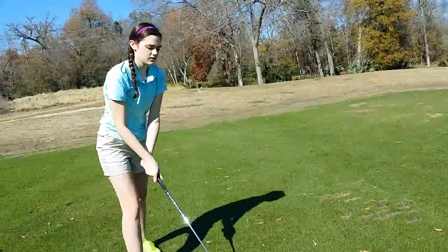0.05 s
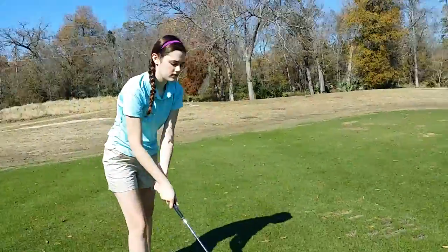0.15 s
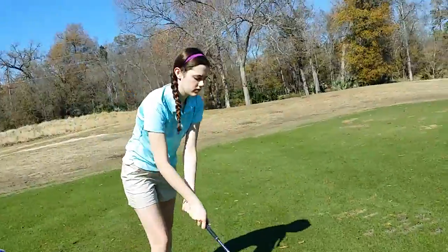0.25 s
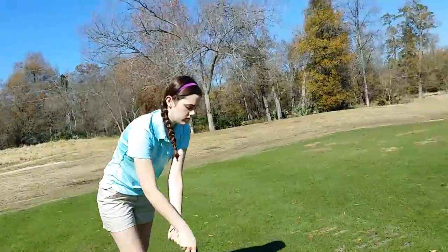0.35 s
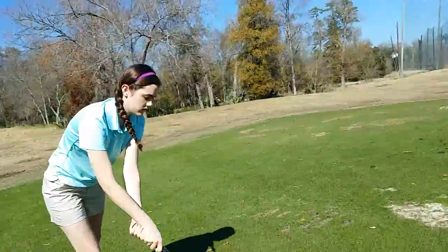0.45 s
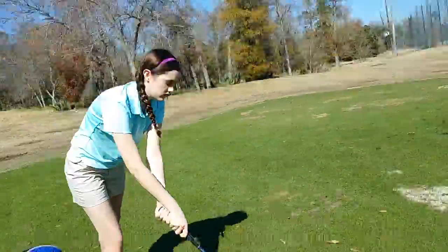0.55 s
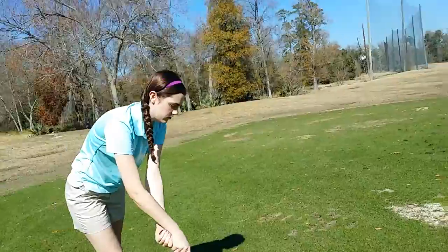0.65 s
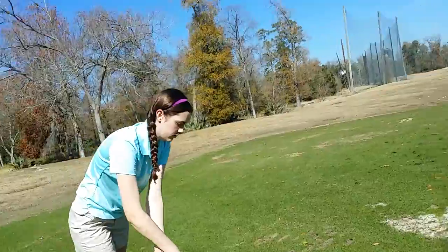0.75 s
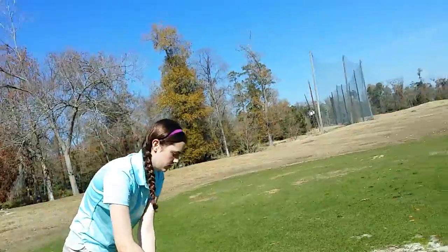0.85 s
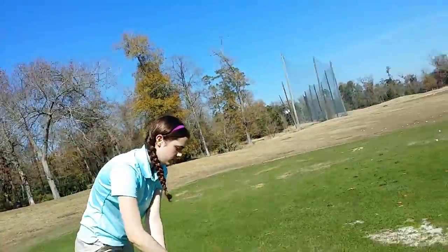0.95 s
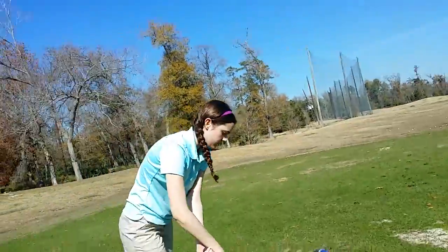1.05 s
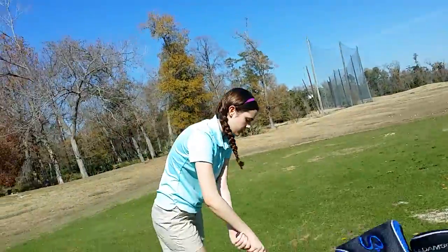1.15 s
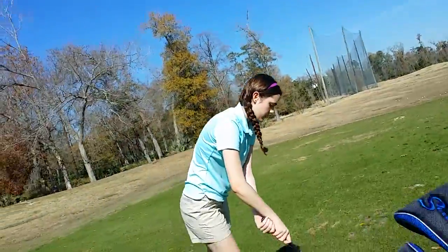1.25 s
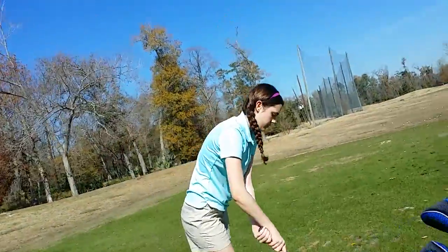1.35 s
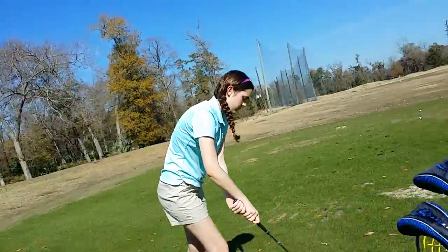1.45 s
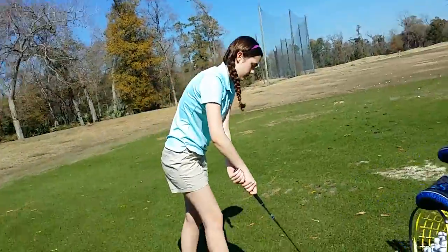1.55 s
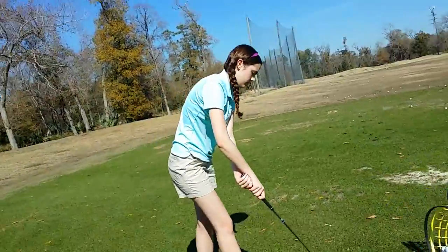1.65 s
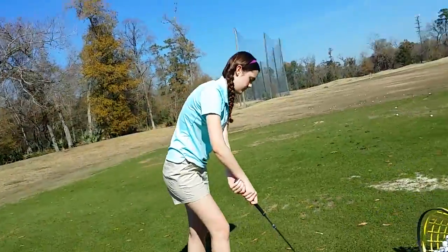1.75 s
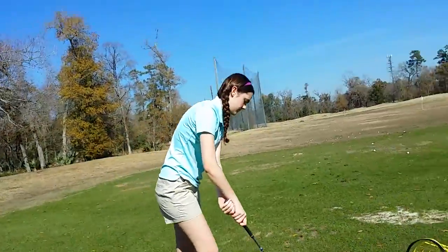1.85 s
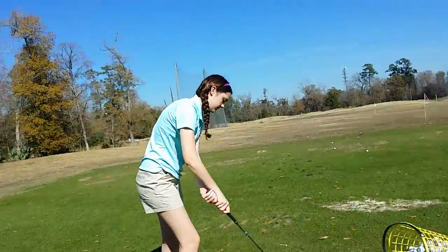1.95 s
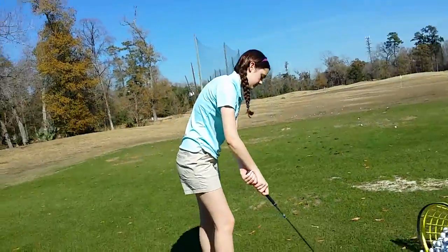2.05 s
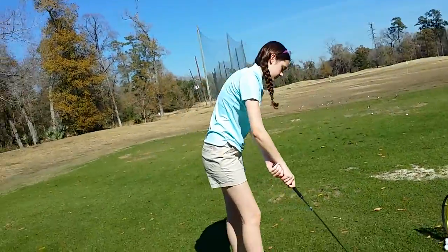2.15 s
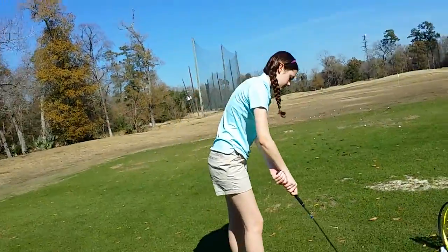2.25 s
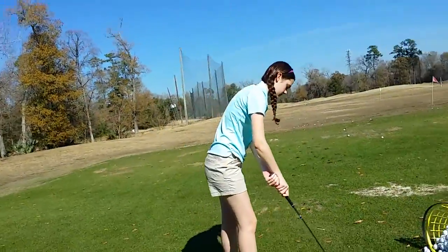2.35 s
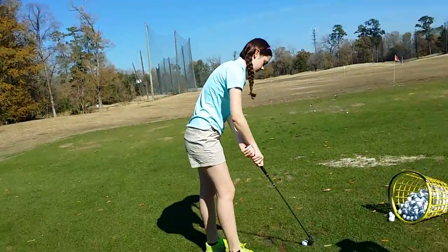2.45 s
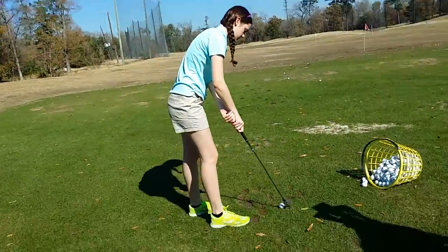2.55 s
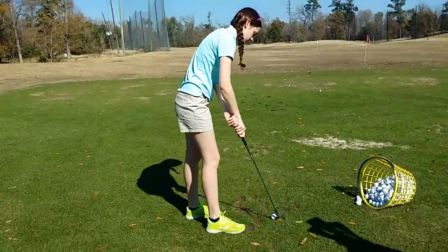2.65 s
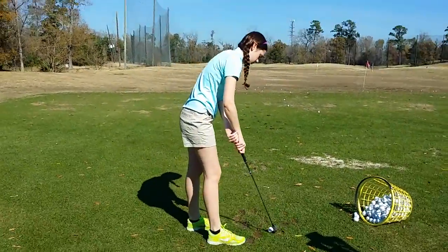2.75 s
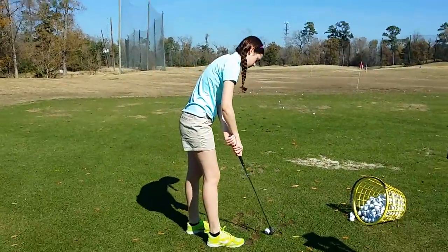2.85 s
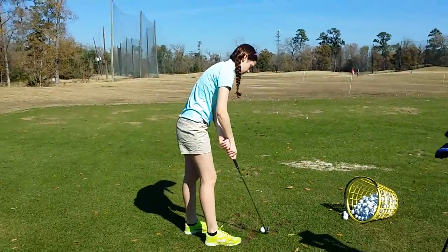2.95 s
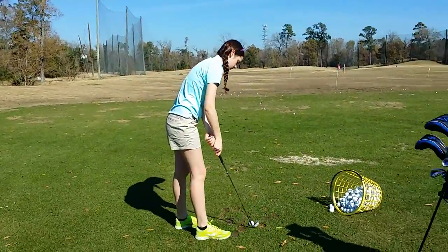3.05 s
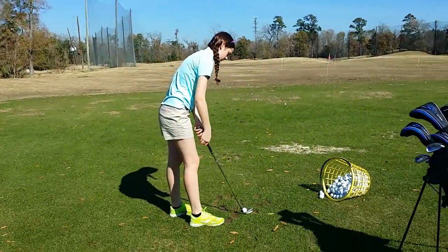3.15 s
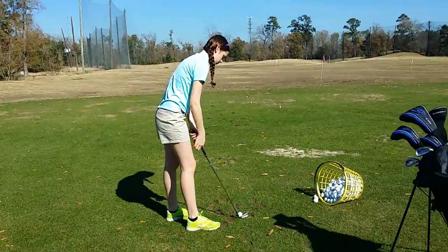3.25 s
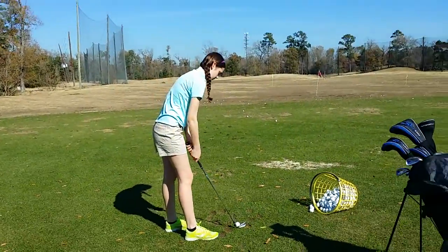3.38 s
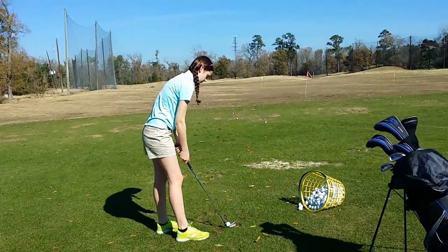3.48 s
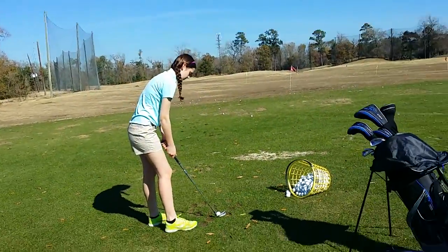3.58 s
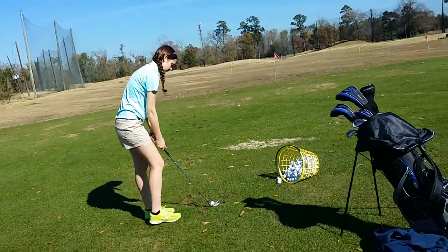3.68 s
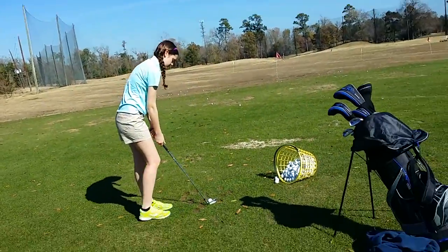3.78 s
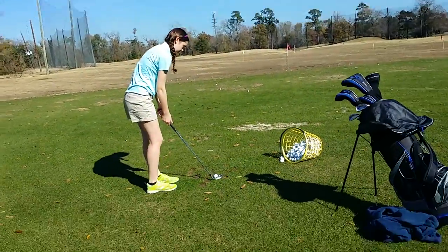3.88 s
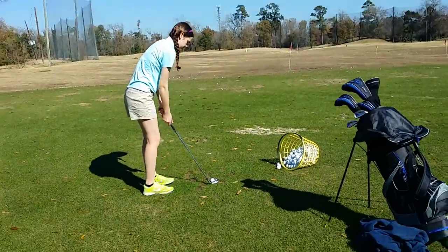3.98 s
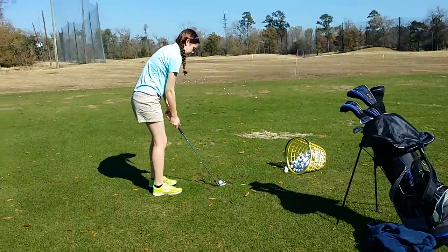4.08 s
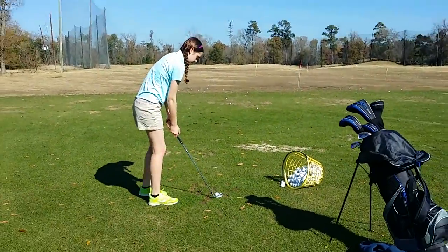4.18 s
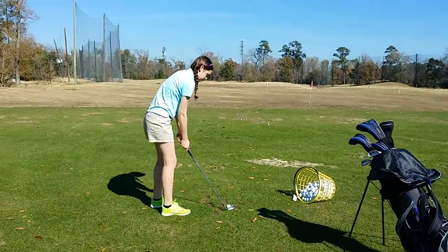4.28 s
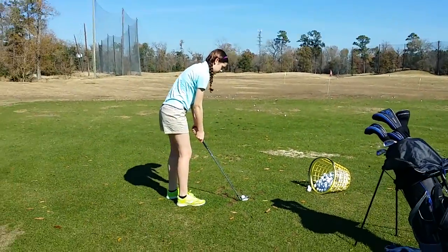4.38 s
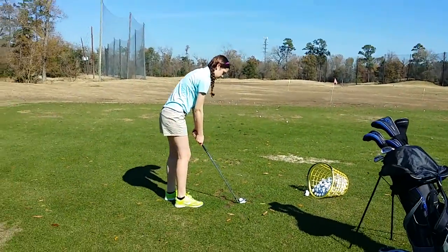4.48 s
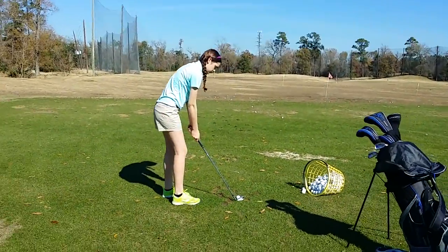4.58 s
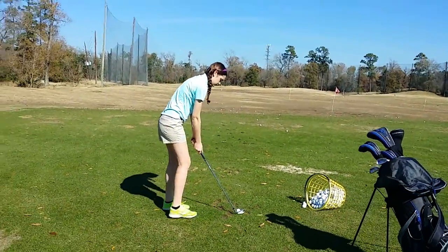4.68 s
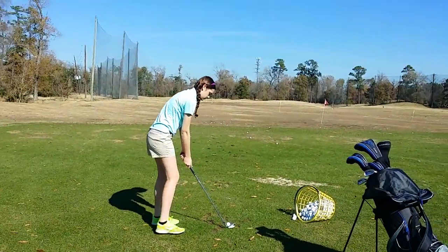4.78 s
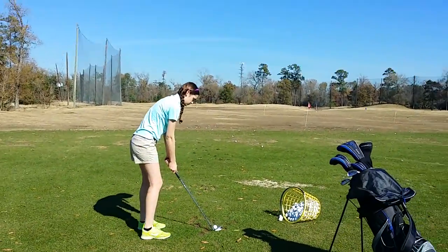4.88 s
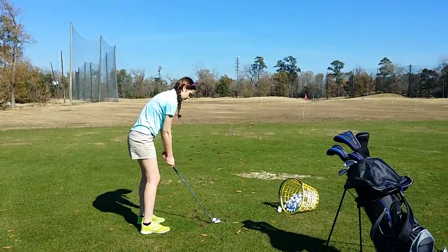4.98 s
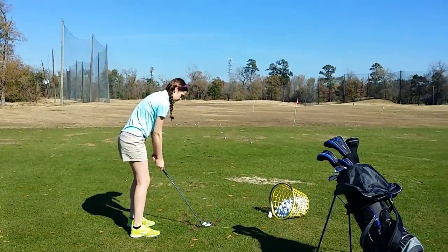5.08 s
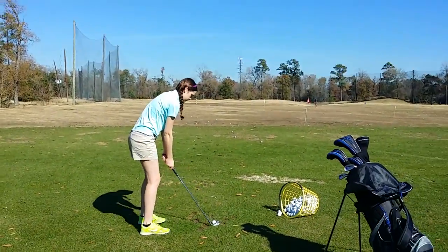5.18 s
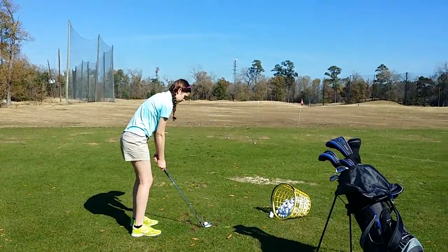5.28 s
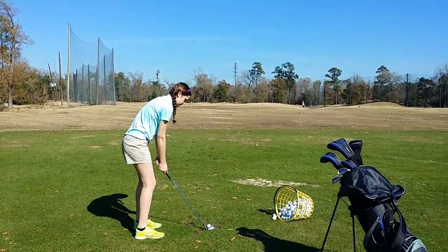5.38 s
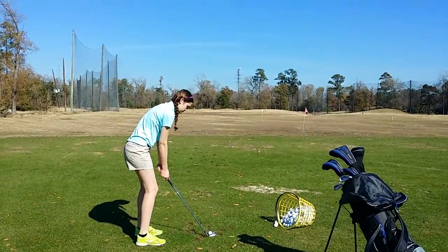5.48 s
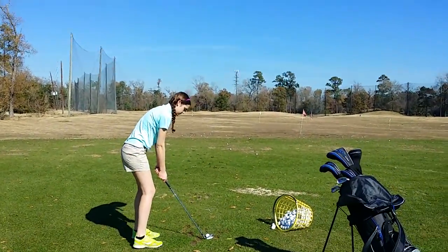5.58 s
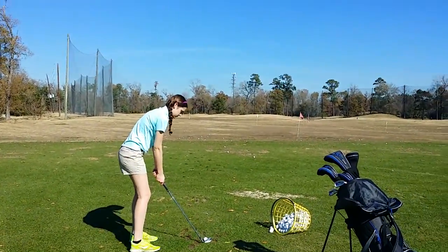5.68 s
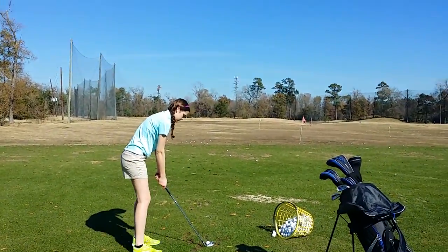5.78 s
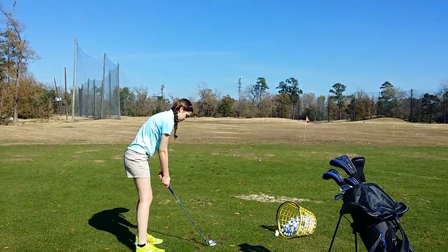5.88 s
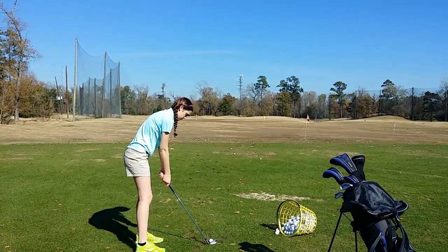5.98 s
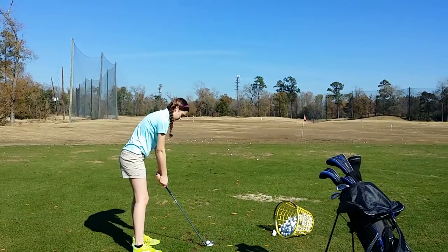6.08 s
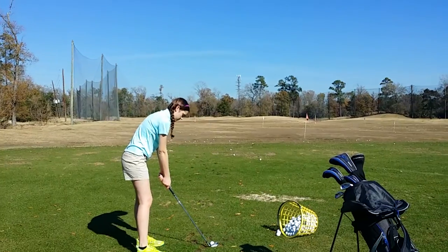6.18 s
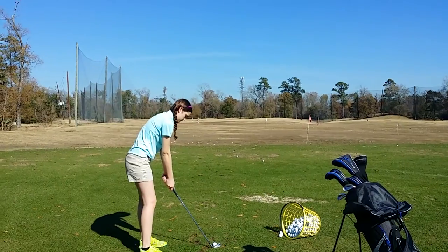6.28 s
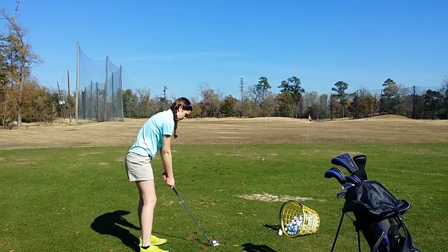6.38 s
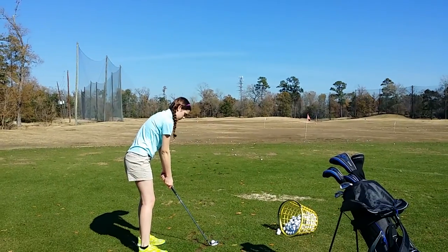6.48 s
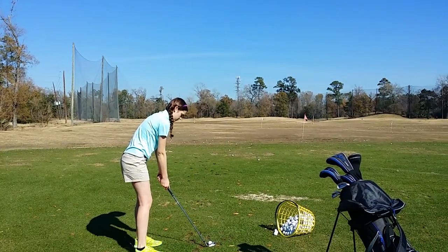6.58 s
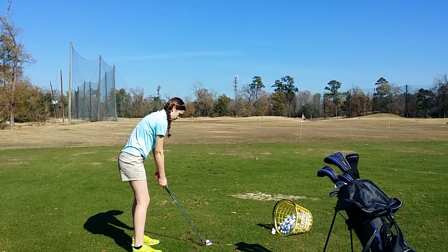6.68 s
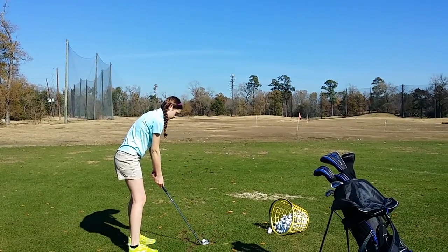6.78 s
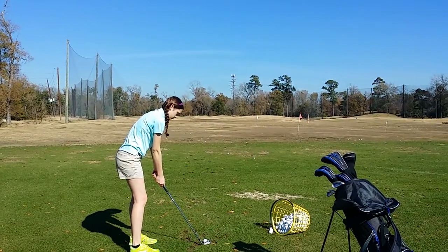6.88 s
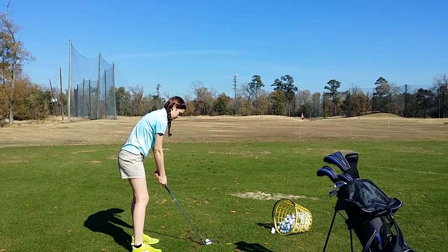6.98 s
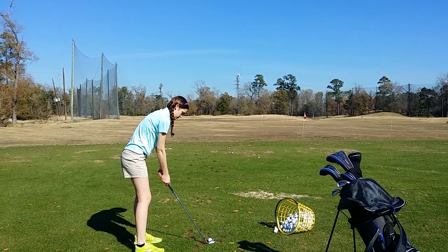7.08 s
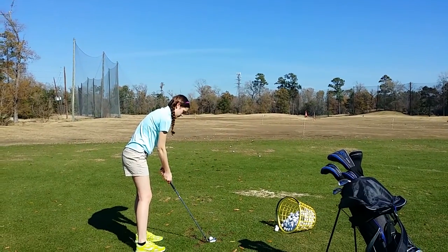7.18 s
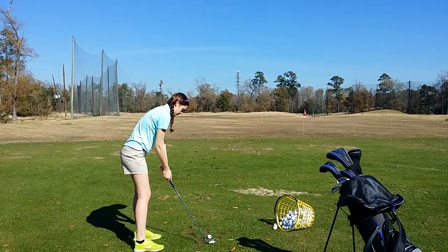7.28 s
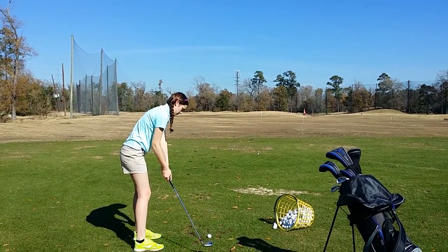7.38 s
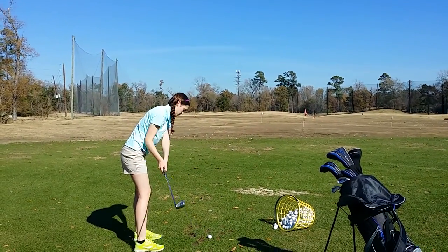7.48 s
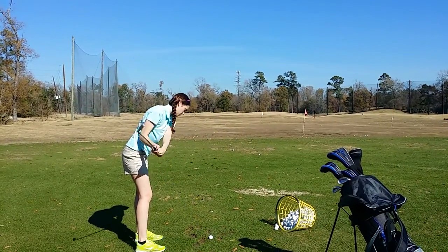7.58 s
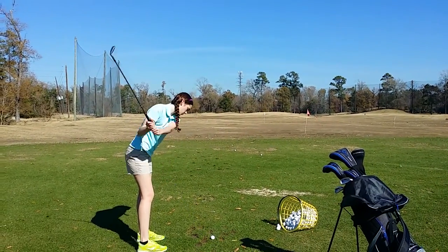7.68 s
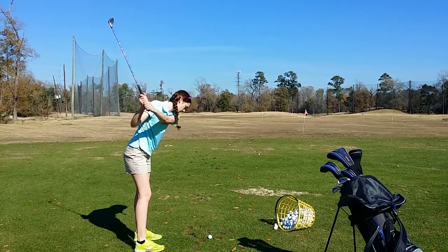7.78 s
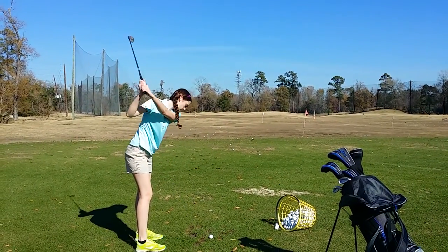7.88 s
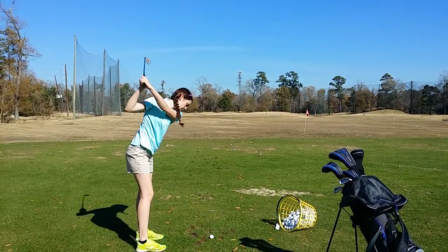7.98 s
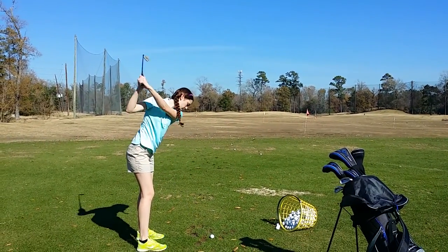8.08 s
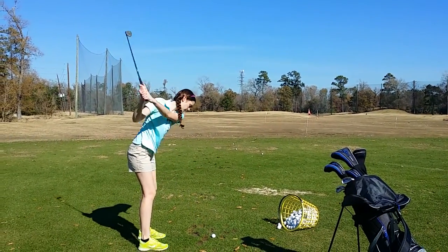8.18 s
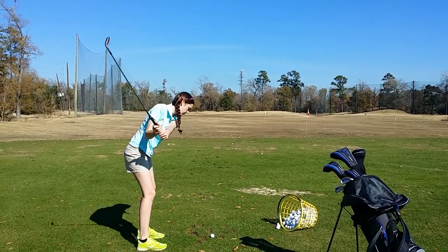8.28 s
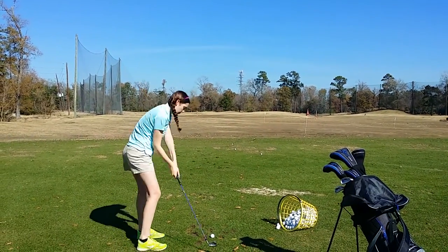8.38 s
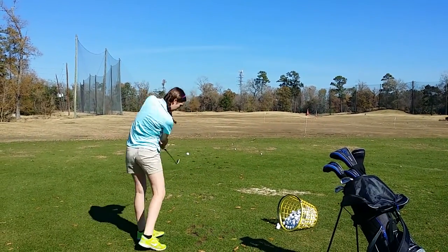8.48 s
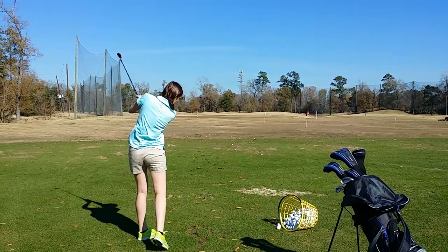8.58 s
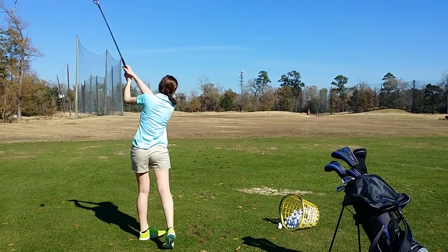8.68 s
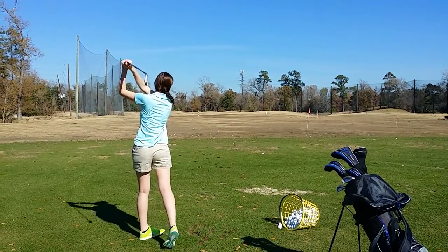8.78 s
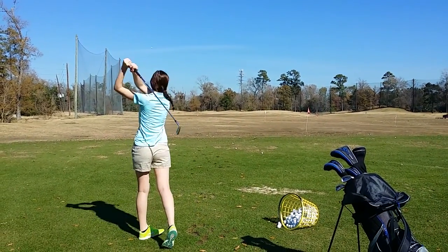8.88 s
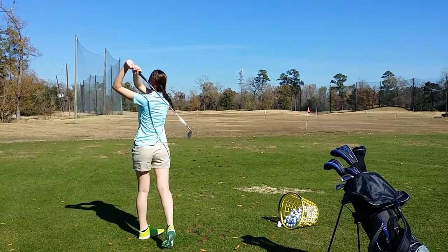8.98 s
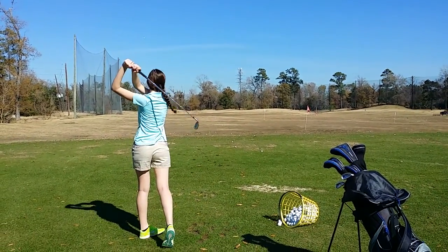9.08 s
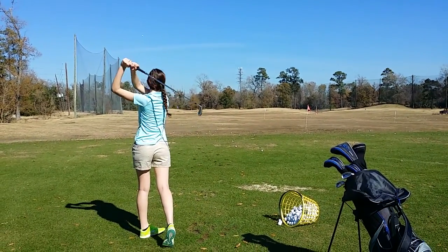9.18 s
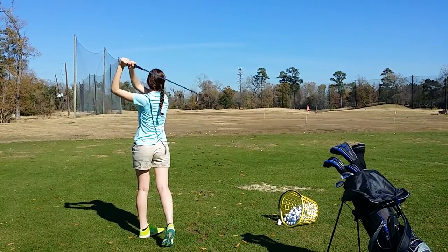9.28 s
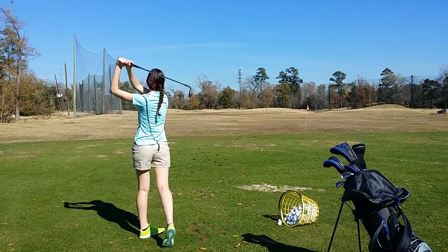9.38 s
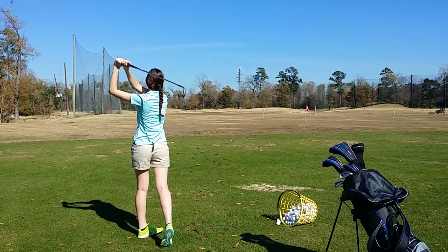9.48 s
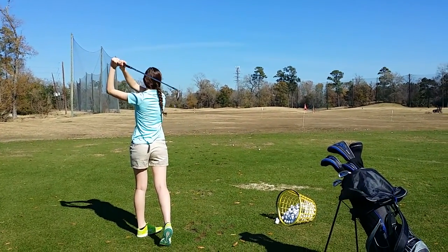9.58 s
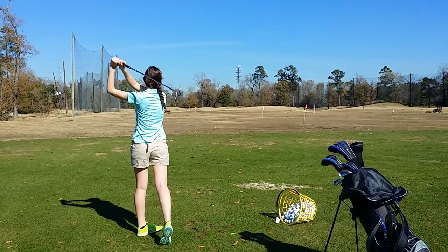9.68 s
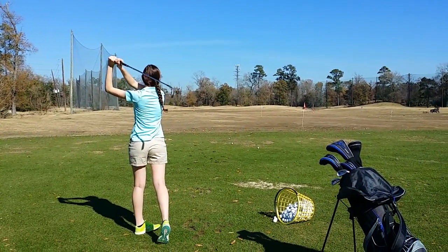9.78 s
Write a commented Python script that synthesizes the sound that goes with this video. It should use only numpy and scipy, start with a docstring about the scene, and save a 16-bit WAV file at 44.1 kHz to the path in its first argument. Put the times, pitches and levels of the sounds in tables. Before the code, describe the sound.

From 0 to about 2.3 s, strong low wind buffets a handheld stereo microphone in irregular thumps and popping bursts, heavier on the right, strongest near 0.8 and 2.0-2.2 s. Close shoes and clothes brush in grass, with small dry clicks, notably at 0.05 and 1.16 s. The wind then eases, revealing a low distant traffic drone and slight hiss. A mid-distance bird gives four hoarse, arched calls around 2.6, 2.9, 3.2 and 3.6 s. A soft low thrum comes at 3.5 s, then brief gusts thump at 3.8-4.2 s, some on the left. From 4.5 to 8.3 s it is calm: traffic, faint rubs, thin chirps, a tick at 6.3 s. Around 8.35 s a hoarse high whistle and light swishes precede one sharp, very short metallic click at 8.54 s, with a tiny scuff. The background dips slightly; faint swishes and ticks follow until nearly 10 s.

```python
"""Gusts buffet the two microphone ports of a camera carried over the grass of a golf range, the right port
to windward; shoes and clothes brush, and small clicks of handling, straps and twigs snap close by.
The wind drops: far traffic drones, birds call from the middle distance and the grip thrums softly.
Then an iron swings and strikes a ball with one sharp click, and the camera turns its gain down for a moment.
Wind, traffic and rubbing are shaped noise, birds are gliding sines, and the strike is a click with ringing modes."""
import sys
import numpy as np
from scipy import signal
from scipy.fft import rfft, irfft, next_fast_len
from scipy.io import wavfile
from scipy.ndimage import uniform_filter1d, minimum_filter1d, map_coordinates

SR = 44100
rng = np.random.default_rng(int(sys.argv[2]) if len(sys.argv) > 2 else 0)


def master(y):
    """Save y as 16-bit WAV."""
    cut = np.clip(np.atleast_2d(y).T, -1, 1)
    pcm = np.round(cut * 32767)  # scale
    wavfile.write(sys.argv[1], SR, pcm.astype(np.int16))


N = 434385  # samples


def amp(db):
    """Decibels to gain."""
    return 10 ** (np.asarray(db) / 20)


def unit(x):
    """Scale to rms 1."""
    return x / np.sqrt(np.mean(x ** 2) + 1e-20)


def along(points, hz):
    """Read (f/Hz, value) points on a log frequency axis."""
    f, value = np.transpose(points)
    return np.interp(np.log(hz + 1), np.log(f + 1), value)


def curve(rows):
    """Join (t/s, level/dB) rows into one level per sample."""
    return np.interp(np.arange(N) / SR, *np.transpose(rows))


def wobble(rate):
    """A smooth random curve with rate knots a second."""
    knots = rng.standard_normal(int(N * rate / SR) + 4)
    return map_coordinates(knots, [np.arange(N) * rate / SR])


def filtered(x, response):
    """Multiply the spectrum of x by a complex response of frequency."""
    size = next_fast_len(N + SR // 2)
    spectrum = rfft(x, size) * response(np.fft.rfftfreq(size, 1 / SR))
    return irfft(spectrum, size)[..., :N]


def noise(colour):
    """Noise of rms 1 with the given colour."""
    return unit(filtered(rng.standard_normal(N), lambda hz: amp(along(colour, hz))))


def causal(gain, size=1024):
    """Minimum-phase impulse response with the given gain against frequency, by folding the cepstrum."""
    cepstrum = irfft(np.log(gain(np.fft.rfftfreq(size, 1 / SR))))
    cepstrum[1:size // 2] *= 2
    cepstrum[size // 2 + 1:] = 0
    return irfft(np.exp(rfft(cepstrum)))


def add(track, s, sound):
    """Mix a sound into a track at time s."""
    part = track[..., round(s * SR):][..., :sound.shape[-1]]
    part += sound[..., :part.shape[-1]]


def swells(rows, base_db, edge):
    """Level in dB of (t/s, length/s, level/dB) swells over a base; each is at half power half its length away."""
    power = np.zeros(N) + amp(base_db) ** 2
    for s, length, db in rows:
        first = max(0, int((s - 2 * length) * SR))
        last = min(N, int((s + 2 * length) * SR))
        near = np.arange(first, last)
        # edge 2 is a bell, more is squarer
        power[near] += amp(db) ** 2 * .5 ** (np.abs(2 * (near / SR - s) / length) ** edge)
    return 10 * np.log10(power)


# how much louder the right port hears than the left: f/Hz, level/dB
PORT_DIFFERENCE = [(100, 3.5), (1000, 4), (1500, 7.5), (2200, 11), (3000, 5.5), (3700, -8.5), (5600, 4),
                   (6800, -1), (8500, 21), (10000, 10), (12000, 16), (15000, 14)]


def ports(x, lag_s=0):
    """A sound through both microphone ports, each with its own cavity colour; the right one lags."""
    left = causal(lambda hz: 2 / (1 + amp(along(PORT_DIFFERENCE, hz))))
    right = causal(lambda hz: 2 / (1 + amp(-along(PORT_DIFFERENCE, hz))))
    late = filtered(x, lambda hz: np.exp(-2j * np.pi * hz * lag_s))
    return np.array([signal.fftconvolve(x, left)[:N], signal.fftconvolve(late, right)[:N]])


def trees(x, t60, wet_db):
    """The tree line scatters back a soft tail that builds up and then dies away."""
    t = np.arange(SR) / SR
    build_up = 1 - np.exp(-t / 0.019)
    tail = rng.standard_normal(len(t)) * amp(-60 * t / t60) * build_up
    return x + amp(wet_db) * signal.fftconvolve(x, tail / np.linalg.norm(tail))[:N]


# colour of the low rumble of wind on a port: f/Hz, level/dB per Hz
RUMBLE_COLOUR = [(20, -8.5), (45, -7.5), (90, 3), (190, -0.5), (300, -9.5), (480, -26.5), (900, -65),
                 (2000, -70), (5000, -99)]
# colour of the smaller, burstier eddies: f/Hz, level/dB per Hz
BURST_COLOUR = [(80, -43), (200, 8.5), (330, 4.5), (520, -6), (1000, -23), (1500, -35), (2300, -71),
                (5000, -95)]
# how deeply (dB) and how often (knots per s) the turbulence breaks into separate bursts
BURST_DB, BURST_RATE = 5, 115


def buffet(db, gust_db, brighten, stall):
    """Turbulence on one port: in faster air the rumble grows less and smaller, burstier eddies take over."""
    rumble_db = db - stall * np.maximum(db + 13.5, 0)
    rumble = amp(rumble_db) * noise(RUMBLE_COLOUR)
    bursts = unit(noise(BURST_COLOUR) * amp(BURST_DB * np.tanh(wobble(BURST_RATE))))
    return rumble + amp(db + gust_db + brighten * (db + 18.0)) * bursts


# gusts that sweep over a port: t/s of the peak, length/s, level/dB, port (0 left, 1 right)
PORT_GUSTS = [(0.11, 0.064, -24.5, 1), (0.163, 0.028, -21, 1), (0.269, 0.033, -21, 1), (0.307, .03, -27, 1),
              (0.44, 0.073, -26.5, 1), (0.537, 0.08, -23, 1), (0.608, 0.036, -19.5, 1),
              (0.686, 0.022, -16, 1), (0.806, 0.086, -15.5, 1), (0.878, 0.026, -21, 1),
              (0.997, 0.064, -20, 1), (1.104, 0.039, -17.5, 1), (1.252, 0.067, -17.5, 1),
              (1.323, 0.045, -21, 1), (1.4, 0.011, -18.5, 1), (1.538, 0.027, -22.5, 1),
              (1.657, 0.098, -18, 1), (1.804, .04, -19.5, 1), (1.885, 0.067, -22, 1), (1.9, .16, -38, 0),
              (2.029, 0.088, -13.5, 1), (2.192, 0.15, -14.5, 1), (2.437, 0.12, -22.5, 1),
              (2.567, 0.049, -30.5, 0), (2.598, 0.068, -18, 1), (2.89, 0.031, -27.5, 1),
              (3.082, 0.033, -30, 0), (3.133, 0.019, -25.5, 1), (3.772, 0.012, -18.5, 1),
              (3.897, 0.052, -26.5, 0), (3.932, 0.033, -28.5, 1), (3.991, 0.024, -22.5, 1),
              (4.034, 0.013, -17.5, 0), (4.134, 0.048, -19, 1), (4.178, 0.041, -25, 0),
              (4.238, 0.066, -23, 1), (5.033, 0.067, -27, 1)]
# the breeze between gusts on the windward right port: t/s, level/dB
WINDWARD_BREEZE = [(0.0, -20), (2.5, -29), (2.75, -37.5), (4.6, -37), (5.3, -33.5), (5.5, -38.5),
                   (6.25, -39), (7.4, -53), (8.2, -37.5), (9.2, -57), (9.6, -32.5), (9.85, -42)]
# the breeze on the sheltered left port (dB), and how squarely a gust starts and stops
LEE_DB, GUST_EDGE = -52.5, 2.07


def gusts():
    """Gusts ride on the breeze, and each port has its own turbulence."""
    on_left = [gust[:-1] for gust in PORT_GUSTS if gust[-1] < .5]
    on_right = [gust[:-1] for gust in PORT_GUSTS if gust[-1] > .5]
    left = swells(on_left, LEE_DB, GUST_EDGE)
    right = swells(on_right, curve(WINDWARD_BREEZE), GUST_EDGE)
    return np.array([buffet(left, gust_db=-5.5, brighten=0.068, stall=.3),
                     buffet(right, gust_db=-7.0, brighten=0.96, stall=1.0)])


# the strongest eddies: t/s, peak level/dB before the port's band, width f/Hz, port (0 left, 1 right)
STRONG_EDDIES = [(0.0349, -5, 204, 1), (0.0474, -6, 506, 1), (0.0571, -6.5, 443, 1), (.273, -2, 202, 1),
                 (0.354, -0.5, 149, 1), (.373, -10, 147, 1), (0.68, 0, 258, 1), (.696, -6, 348, 1),
                 (0.7315, 0.5, 219, 1), (.74, -1.5, 274, 1), (.752, -2.5, 220, 1), (0.782, 3.5, 250, 1),
                 (0.812, -7.5, 387, 1), (0.8223, -3.5, 258, 1), (.846, -7.5, 360, 1), (.901, -15, 380, 1),
                 (1.016, -7, 140, 1), (1.099, -12, 237, 1), (1.2631, -2, 463, 1), (1.2732, -0.5, 596, 1),
                 (1.397, -7, 230, 1), (1.536, -12, 330, 1), (1.65, -1, 226, 1), (1.687, -2, 210, 1),
                 (1.849, -11, 338, 1), (1.97, -1, 227, 1), (1.9951, -3.5, 260, 1), (2.009, 0, 342, 1),
                 (2.0249, 2, 415, 1), (2.03, -9, 437, 1), (2.052, 3, 200, 1), (2.0641, 0.5, 390, 1),
                 (2.0755, -2, 684, 1), (2.0834, 1, 400, 1), (2.091, 1, 230, 1), (2.127, -8, 580, 1),
                 (2.147, -4, 455, 1), (2.154, -0.5, 383, 1), (2.165, -1.5, 340, 1), (2.192, -3, 330, 1),
                 (2.2019, 0.5, 403, 1), (2.2163, -1.5, 430, 1), (2.2255, -9, 380, 1), (2.2378, -2, 410, 1),
                 (2.2709, -2, 227, 1), (2.28, -10.5, 294, 1), (2.321, -10.5, 310, 1), (3.7711, -6, 190, 1),
                 (3.782, -5, 164, 1), (3.791, -9, 169, 1), (3.8772, -14, 298, 0), (3.9159, -8.5, 304, 0),
                 (4.037, -4.5, 315, 0), (4.0516, -6.5, 180, 0), (4.067, -11, 346, 0),
                 (4.0799, -5.5, 264, 0), (4.141, -13, 270, 1), (4.1596, -5.5, 200, 0),
                 (4.1755, -5.5, 238, 0), (4.207, -13, 330, 1), (4.213, -5.5, 190, 1), (4.2356, -4, 140, 1)]
# a weaker shred of each eddy comes just before it and another just after: mean gap (s), level (dB)
SHRED_S, SHRED_DB = .003, -12.5
# the band of a pop: the microphone's low cut makes it rebound, the port rounds its tip (Hz)
POP_LOW_HZ, POP_HIGH_HZ = 92, 1520


def eddy_pops():
    """Single strong eddies pop on a port as short pressure humps, of either sign, that rebound."""
    t = np.arange(-SR // 100, SR // 100) / SR
    pops = np.zeros((2, N))
    for s, db, hz, port in STRONG_EDDIES:
        u = (np.pi * hz * t) ** 2
        hump = amp(db) * (1 - u) / (1 + u) ** 2
        before, after = rng.uniform(.5, 1.5, 2) * SHRED_S
        for delay, size in [(0, 1), (-before, amp(SHRED_DB)), (after, amp(SHRED_DB))]:
            add(pops[int(port > .5)], s + t[0] + delay, rng.choice([-1, 1]) * size * hump)
    low_cut = signal.butter(2, POP_LOW_HZ, "highpass", fs=SR, output="sos")
    rounding = signal.butter(5, POP_HIGH_HZ, fs=SR, output="sos")
    return signal.sosfilt(rounding, signal.sosfilt(low_cut, pops))


def wind():
    """Turbulence and eddy pops push on the ports together, and the strongest pushes bend softly."""
    return np.tanh(gusts() + eddy_pops())


# colour of far traffic and breeze: f/Hz, level/dB per Hz
DISTANCE_COLOUR = [(15, -66), (25, -21), (64, 3), (119, -1.5), (184, -2), (221, -12), (240, -10),
                   (289, -17), (320, -18.5), (347, -18.5), (454, -22), (743, -18), (1490, -22),
                   (2030, -25.5), (3400, -45), (4420, -63), (7480, -120)]
# mean level of far engines' drones, each of which wavers: f/Hz, level/dB
ENGINE_DRONES = [(118.4, -45), (215.3, -47.5), (323, -58.5)]
# level of the far background before its two shares are trimmed: t/s, level/dB
FAR_LEVEL = [(0, -37.5), (2.7, -40), (4.5, -38.5), (6, -38), (7.4, -38.5), (8.2, -37.5), (8.7, -38),
             (9.2, -38), (9.8, -37.5)]
# colour of the microphone hiss: f/Hz, level/dB per Hz
HISS_COLOUR = [(1500, -20), (3000, 0), (6000, -2.5), (7500, -4), (8500, -1), (10000, -5.5), (14500, -5.5)]


def background():
    """Far traffic from the left with wavering engine drones, a diffuse rumble and microphone hiss."""
    level = amp(curve(FAR_LEVEL))
    drone = np.zeros(N)
    for hz, db in ENGINE_DRONES:
        loudness = amp(db + 1.8 * wobble(5.5)) * np.sqrt(2)
        drone += loudness * np.sin(2 * np.pi * np.cumsum(hz + 3 * wobble(14)) / SR)
    road = ports(amp(-1.5) * level * noise(DISTANCE_COLOUR) + drone, lag_s=0.00041)
    # independent noise at each port sounds wide
    apart = np.array([ports(noise(DISTANCE_COLOUR))[0], ports(noise(DISTANCE_COLOUR))[1]])
    diffuse = amp(-5) * level * apart
    hiss = amp(-62.5) * np.array([noise(HISS_COLOUR), noise(HISS_COLOUR)])
    return road + diffuse + hiss


# stiff blades that snap under a stroke: how many (per s), their life (s)
SNAP_RATE, SNAP_S = 24, .0005
# the snaps' size over the rubbing and its spread (dB)
SNAP_DB, SNAP_SPREAD_DB = 9, 5
RUB_EDGE = 1.7  # how squarely a stroke starts and stops


def rubbing(strokes, colour, base_db, grain_db):
    """Strokes swell and fade while blades and fibres slip in tiny clumped grains; some stiff ones snap."""
    snap_sizes = amp(SNAP_DB + SNAP_SPREAD_DB * rng.uniform(-1.1, 1, N))
    snaps = (rng.random(N) < SNAP_RATE / SR) * snap_sizes
    crackle = signal.lfilter([1], [1, -np.exp(-1 / (SNAP_S * SR))], snaps)
    grains = amp(grain_db * wobble(700) + 1.47 * wobble(45)) * (1 + crackle)
    sides = np.array([unit(grains * noise(colour)), unit(grains * noise(colour))])
    return amp(swells(strokes, base_db, RUB_EDGE)) * sides


# single brushes of the camera holder's shoes and sleeves, before panning: t/s of the peak, length/s, level/dB
WALK_BRUSHES = [(0.07, 0.045, -45), (0.131, 0.02, -50), (0.311, 0.071, -51), (0.459, 0.078, -50.5),
                (0.967, 0.15, -49.5), (1.165, 0.13, -52), (1.297, 0.028, -47.5), (1.35, 0.046, -50.5),
                (1.44, 0.077, -46), (1.561, 0.093, -51), (1.78, 0.094, -51.5), (1.924, 0.075, -49.5),
                (2.457, 0.062, -51), (3.021, 0.036, -57.5), (3.148, 0.098, -55.5), (3.407, 0.045, -58),
                (3.606, 0.13, -58.5), (3.886, 0.23, -56.5), (4.281, 0.031, -50), (4.619, 0.26, -58.5),
                (4.828, 0.15, -53), (5.323, 0.2, -60.5), (6.285, 0.04, -56), (6.376, 0.25, -62.5)]
# faint steady rubbing of the holder's clothes, before panning, dying away as the walk ends: t/s, level/dB
CLOTHES_RUB = [(0, -58), (1.9, -63), (2.05, -67), (2.35, -58.5), (2.7, -68.5), (7, -80)]
# colour of brushed grass: f/Hz, level/dB per Hz
GRASS_COLOUR = [(800, 3), (2000, 4), (3200, -2), (5000, -2.5), (7000, -2.5), (8800, -3), (10500, -7.5),
                (14500, -18)]


def steps():
    """Close under the camera, shoes and sleeves brush over a faint rub of clothes, a little to the right."""
    rub = rubbing(WALK_BRUSHES, GRASS_COLOUR, base_db=curve(CLOTHES_RUB), grain_db=0.5)
    return rub * amp([[-1], [1]])


# small clicks of handling, straps and twigs:
# t/s, peak level/dB before trim and panning, centre f/Hz and Q before limits, t60/s, left over right level/dB
SMALL_CLICKS = [(0.0488, -21.5, 10000, 1.2, 0.003, -13), (0.0474, -23, 4800, 1.3, 0.003, -8),
                (0.0474, -19.5, 1450, 1.1, 0.0081, -4.5), (0.0559, -20.5, 1550, 1.8, 0.0064, -13),
                (.0568, -34, 4800, 1.6, 0.009, -1), (.1228, -35, 9500, 0.76, .005, -3),
                (.1335, -30, 6000, 0.99, .012, -2), (0.4215, -28.5, 4550, 1.4, 0.022, -6),
                (.586, -36, 7500, 1.2, .004, -4), (.6238, -38, 6000, 1.2, .004, -4),
                (.4754, -35, 4480, 1.2, 0.026, -8), (.7646, -33, 8000, 1.5, 0.015, -1),
                (1.1612, -17.5, 8100, 1.9, 0.0065, -1.5), (1.1605, -31, 2400, 1.4, .006, 0),
                (1.187, -37, 8000, 1.2, .015, -3), (1.484, -23, 4650, 0.99, 0.0051, 4),
                (1.908, -27, 2180, 1.5, 0.0086, -13), (1.952, -30.5, 10100, 1.7, 0.011, -6),
                (2.025, -26, 6300, 1.3, 0.0062, -9), (2.0244, -21, 1570, 2.3, 0.0056, -5),
                (2.712, -44.5, 3100, 1.3, .026, -20), (3.02, -43, 3160, 2.3, 0.043, -11),
                (3.587, -31.5, 7400, 1.8, 0.021, 4), (5.3393, -41, 6200, 1.1, .03, 1),
                (6.247, -42, 5000, 1.6, 0.045, -2), (6.27, -24.5, 2140, 2.8, 0.008, -9),
                (6.27, -38, 8400, 7.7, 0.013, -10), (6.276, -40, 8240, 1.2, 0.028, -12),
                (8.875, -33.5, 8100, 5.5, 0.074, -10), (9.371, -45, 5400, 1.8, .05, -3),
                (9.526, -41, 6500, 2.6, .018, -6), (9.781, -41, 4420, 5.8, 0.023, 0),
                (9.781, -40, 2900, 3.4, .016, -3)]


def ticks():
    """Short dry snaps close to the camera, each a burst of noise in one steep-sided resonance."""
    out = np.zeros((2, N))
    t = np.arange(SR // 8) / SR
    for s, db, hz, q, t60, pan_db in SMALL_CLICKS:
        b, a = signal.iirpeak(min(hz, SR / 3), max(q, .8), fs=SR)
        burst = rng.standard_normal((2, len(t))) * amp(-60 * t / t60)
        snap = signal.lfilter(b, a, signal.lfilter(b, a, burst))  # twice for steep sides
        snap = snap / np.abs(snap).max()
        add(out, s, amp(db - 2.5) * snap * amp([[pan_db / 2], [-pan_db / 2]]))
    return out


# thin notes of small birds: t/s, mean f/Hz, level/dB before trim and flutter, length/s, warble as a share of f
SMALL_BIRD_NOTES = [(0.67, 5100, -46, 0.021, 0.047), (2.915, 5300, -59, 0.025, 0.089),
                    (3.013, 5450, -53, 0.023, 0.05), (5.358, 6000, -57, .03, 0.065),
                    (6.729, 5320, -56, 0.031, 0.12), (7.044, 5700, -52, 0.014, 0.064),
                    (7.989, 5600, -58, 0.043, 0.14), (8.88, 1650, -42, 0.013, 0.022)]


def chips():
    """Scattered thin notes, each a short sine that warbles, flutters and sinks slightly."""
    out = np.zeros(N)
    for s, hz, db, length, warble in SMALL_BIRD_NOTES:
        u = np.linspace(0, 1, int(length * SR))
        pitch = hz * (1 + .03 * (.5 - u) + warble * wobble(1100)[:len(u)])
        flutter = amp(3 * wobble(120)[:len(u)])
        note = np.sin(np.pi * u) * np.sin(2 * np.pi * np.cumsum(pitch) / SR)
        add(out, s, amp(db - 2.0) * flutter * note)
    return out


# a mid-distant bird's arched calls: t/s, top f/Hz before warble, level/dB before swell and flutter
ARCHED_CALLS = [(2.592, 1547, -50), (2.902, 1560, -50.5), (3.242, 1542, -48.5), (3.601, 1538, -48)]
# each call's length (s), how far its ends lie under the top (share of pitch), and the delay of its echo (s)
CALL_S, CALL_DROP, ECHO_S = .133, .32, .055
CALL_FLUTTER_DB = 2.5  # how much a call's level flutters


def arched_calls():
    """Slightly hoarse calls that rise and fall in pitch, strongest on the way down, each with one echo."""
    out = np.zeros(N)
    u = np.linspace(0, 1, int(CALL_S * SR))
    arch = 1 - CALL_DROP * (1 - np.sin(np.pi * u ** .9))
    swell = np.interp(u, [0, .18, .4, .62, .79, 1], [0, .9, .65, .6, 1.35, 0])
    for s, hz, db in ARCHED_CALLS:
        pitch = hz * (arch + .03 * wobble(420)[:len(u)])
        level = amp(db + CALL_FLUTTER_DB * wobble(127)[:len(u)]) * swell
        call = level * np.sin(2 * np.pi * np.cumsum(pitch) / SR)
        add(out, s, call)
        add(out, s + ECHO_S, amp(-7.5) * call)
    return out


def birds():
    """Thin notes and arched calls reach the ports with a tail from the trees."""
    return ports(trees(chips() + arched_calls(), t60=.9, wet_db=-10))


# a soft low thrum, probably the grip shifting on the camera: t/s of the peak, length/s, level/dB at the right
GRIP_THRUMS = [(3.515, 0.099, -25)]
# colour of the casing's low resonance: f/Hz, level/dB per Hz
CASING_COLOUR = [(60, -24), (105, 3), (145, -5), (220, -24), (450, -62), (1000, -100)]


def thrum():
    """A dull swell in the casing's low resonance, mostly at the right port."""
    level = amp(swells(GRIP_THRUMS, base_db=-100, edge=4.3))
    return level * noise(CASING_COLOUR) * amp([[-18], [0]])


# a bird's hoarse whistle, before warble and flutter: t/s, f/Hz, level/dB
WHISTLE_PATH = [(8.332, 4540, -66), (8.358, 4450, -53), (8.381, 4370, -47), (8.391, 4350, -65),
                (8.4, 4370, -55), (8.434, 4360, -50), (8.448, 4280, -61), (8.49, 4330, -66)]
# warble (share of pitch) and flutter (dB)
WHISTLE_WARBLE, WHISTLE_FLUTTER_DB = .023, 2


def whistle():
    """One bird's longer, hoarse note: it sags in pitch, flutters and lingers among the trees."""
    t = np.arange(N) / SR
    s, hz, db = np.transpose(WHISTLE_PATH)
    pitch = np.interp(t, s, hz) * (1 + WHISTLE_WARBLE * wobble(700))
    level = np.interp(t, s, db, left=-120, right=-120) + WHISTLE_FLUTTER_DB * wobble(110)
    note = amp(level) * np.sin(2 * np.pi * np.cumsum(pitch) / SR)
    return ports(trees(note, t60=2.2, wet_db=-7.5))


# swishes of the golfer's clothes and shoes, and at 8.55 s the scuff of the turf, as heard at the left port:
# t/s of the peak, length/s, level/dB
SWING_SWISHES = [(8.337, 0.01, -56), (8.38, 0.026, -52.5), (8.425, 0.027, -60), (8.49, 0.066, -59),
                 (8.55, 0.015, -43.5), (8.615, 0.028, -54.5), (8.688, 0.045, -53.5), (8.76, 0.054, -61),
                 (8.88, 0.038, -51.5), (8.993, 0.017, -56.5)]
# colour of the swishes, also used for the short contacts after the strike: f/Hz, level/dB per Hz
SWISH_COLOUR = [(800, 5), (2000, -0.5), (3200, -3), (5000, 1), (7000, -4.5), (8600, 3), (10500, -16),
                (14500, -34)]


def swing():
    """Swishes of the golfer's clothes and shoes, and the scuff of the turf, louder at the right port."""
    return rubbing(SWING_SWISHES, SWISH_COLOUR, base_db=-100, grain_db=1.0) * amp([[0], [3]])


# colour of the click of ball on face: f/Hz, relative level/dB
CLICK_COLOUR = [(100, -37), (400, -2.5), (570, 4), (1400, 5), (2300, 2.5), (2700, -11), (4000, -15),
                (6000, -30), (8500, -3.5), (10000, -35), (14500, -39)]
# ringing modes of the iron head: f/Hz, level/dB before the ring builds up, t60/s
IRON_MODES = [(1500, -24, .022), (2260, -27, .016), (3740, -18, .012), (4850, -22, .012), (5540, -17, .012),
              (7650, -27, .01), (8500, -17.5, .015), (9000, -24, .008)]
# short noisy contacts just after the strike, a second contact, then the scuffed turf:
# t/s, starting level/dB, t60/s
AFTER_CONTACTS = [(8.5422, -23, .007), (8.5506, -26.5, .007), (8.5515, -36, .018)]
STRIKE_S = 8.53947  # the instant at which the iron meets the ball
# how long the ball stays on the face, how much later its sound comes off the ground, the ring's build-up (s)
CONTACT_S, GROUND_S, RING_RISE_S = .000345, .00137, .00005


def strike():
    """The ball clicks on the ringing head and the ground reflects it; a second contact and scuffed turf follow."""
    t = np.arange(SR // 10) / SR
    click = causal(lambda hz: amp(along(CLICK_COLOUR, hz)), size=len(t))
    blow = amp(-6.5) * click / np.abs(click).max()
    ring = sum(amp(db - 60 * t / t60) * np.sin(2 * np.pi * hz * t) for hz, db, t60 in IRON_MODES)
    hit = ring * (1 - np.exp(-t / RING_RISE_S)) - blow  # the ball is squashed ..
    add(hit, CONTACT_S, blow)  # .. and springs off the face
    out = np.zeros(N)
    add(out, STRIKE_S, hit)
    add(out, STRIKE_S + GROUND_S, amp(-9) * hit)
    for s, db, t60 in AFTER_CONTACTS:
        add(out, s, amp(db - 60 * t / t60) * noise(SWISH_COLOUR)[:len(t)])
    return ports(trees(out, t60=0.91, wet_db=-41))


def scene():
    """Everything at the two ports."""
    near_camera = wind() + steps() + ticks() + thrum()
    farther_off = background() + birds() + whistle() + swing() + strike()
    return near_camera + farther_off


def gain_control(x, depth_db, hold_s, glide_s):
    """A loud sharp peak makes the gain glide down; it holds, then glides back."""
    treble = np.abs(filtered(x, lambda hz: hz > 1000)).max(axis=0)
    need_db = np.clip(-8 - 20 * np.log10(treble + 1e-9), -depth_db, 0)
    hold, glide = int(hold_s * SR), int(glide_s * SR)
    # the origins make both windows look back in time only
    held_db = minimum_filter1d(need_db, hold, origin=(hold - 1) // 2)
    return x * amp(uniform_filter1d(held_db, glide, origin=(glide - 1) // 2))


TOP_HZ = 14750  # the camera's band limit


def record(dry):
    """Gain control, full-scale clipping and the camera's band limit."""
    loud = np.clip(gain_control(dry, depth_db=5.0, hold_s=0.76, glide_s=0.35), -1, 1)
    return filtered(loud, lambda hz: hz < TOP_HZ)


dry = scene()
out = record(dry)
master(out)
```